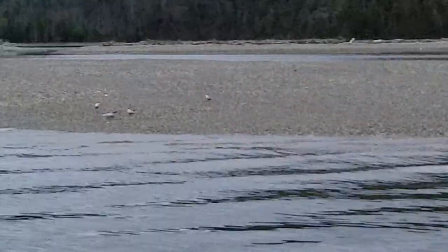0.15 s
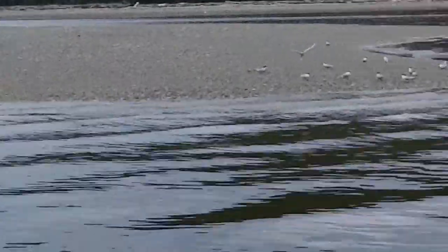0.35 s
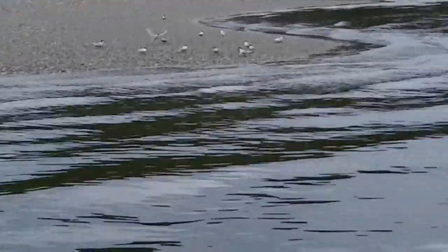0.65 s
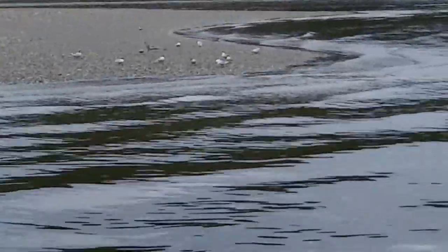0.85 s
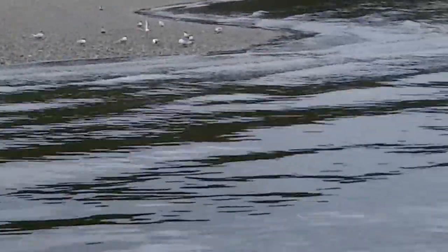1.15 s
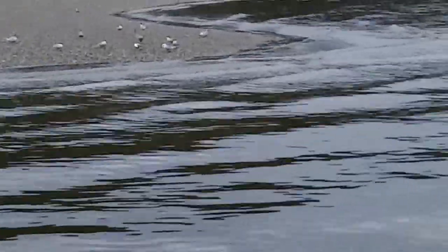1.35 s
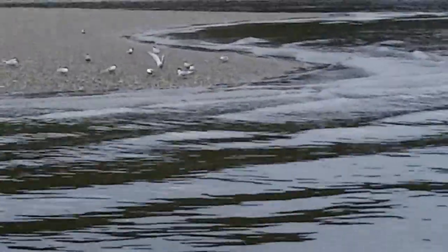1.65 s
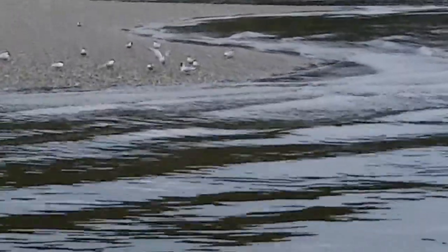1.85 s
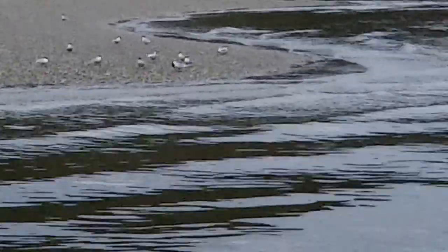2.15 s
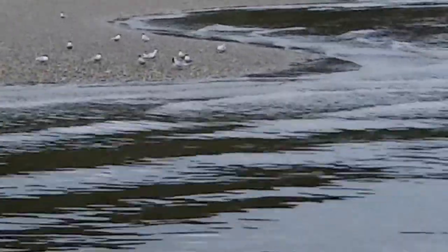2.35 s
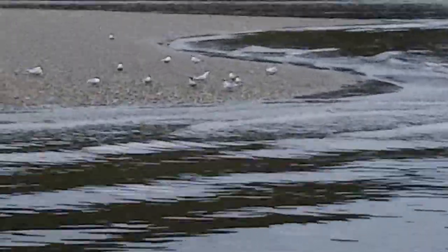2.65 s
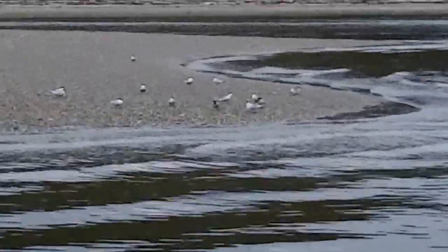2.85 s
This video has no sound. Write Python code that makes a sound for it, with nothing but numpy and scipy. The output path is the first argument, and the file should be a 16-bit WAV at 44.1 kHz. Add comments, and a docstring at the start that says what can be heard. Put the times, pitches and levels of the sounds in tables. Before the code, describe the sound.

Terns squawk over one another almost without pause, raspy and chopped by throat flutter, loudest at the start. A flock behind them, soft water wash and a low idling boat engine continue underneath; small taps come early.

```python
"""Throughout, water washes, a small boat's two-cylinder engine idles and far terns squawk on a gravel spit.
From the first moments near terns squawk over each other until the end: each call is a whistle with
overtones, chopped by a flutter in the throat. A low-level hum stops after a third of a second, about when
the first of four ticks on board sounds. Water is shaped noise; engine and ticks are struck, ringing modes."""
import sys
import numpy as np
from scipy import signal
from scipy.fft import rfft, irfft, next_fast_len
from scipy.io import wavfile
from scipy.ndimage import uniform_filter1d

SR = 44100
rng = np.random.default_rng(int(sys.argv[2]) if len(sys.argv) > 2 else 0)


def generate_wav(signal):
    """Clip the signal to [-1, 1] and save it as 16-bit WAV at the path in sys.argv[1]."""
    frames = np.transpose(np.atleast_2d(signal))
    scaled = np.clip(frames, -1, 1) * 32767
    pcm = np.round(scaled).astype(np.int16)
    wavfile.write(sys.argv[1], SR, pcm)


def elevation(decibels):
    """Turn decibel levels (scalar or array-like) into linear amplitude ratios."""
    levels = np.asarray(decibels, float)
    return 10 ** (levels / 20)


N = 132741  # length in samples


def set_rms(x, rms_db):
    """Scale a sound to an rms (average power) level."""
    return x * elevation(rms_db) / np.sqrt(np.mean(x ** 2))


def walk(rate_hz, size=N):
    """Smooth random wander with a spread of about 1: random steps at rate_hz, averaged twice."""
    hold = int(SR / rate_hz)
    steps = np.repeat(rng.standard_normal(size // hold + 1), hold)
    smooth = uniform_filter1d(uniform_filter1d(steps, hold), hold)
    return 1.752 * smooth[:size]  # restores the spread lost in averaging


def ring(x, pitch_hz, t60_s):
    """One vibrating mode driven by x: a tone that dies away by 60 dB in t60_s."""
    pole = np.exp(2j * np.pi * pitch_hz / SR - np.log(1000) / (t60_s * SR))
    return signal.lfilter([1], [1, -pole], x).imag


def wash():
    """Water: third-octave bands of noise that swell together and also flicker one by one."""
    # relative spectrum of water wash and hiss: pitch_hz [Hz], level_db [dB per Hz]
    spectrum = [(25, 9), (60, -26.5), (150, -6.5), (320, -13), (520, -15), (800, -15.5), (1150, -13.5),
                (1800, -18), (3000, -44), (5000, -30.5), (6500, -36.5), (7700, -62), (8600, -40),
                (10000, -43.5), (14500, -46)]
    wash_db = -40  # rms
    swell_db, flicker_db, treble_flicker_db = 0.45, 2.25, 3.15
    n = next_fast_len(N)
    f = np.fft.rfftfreq(n, 1 / SR) + 1  # the 1 avoids log of zero
    pitch_hz, level_db = np.array(spectrum).T
    noise = rfft(rng.standard_normal(n)) * elevation(np.interp(np.log(f), np.log(pitch_hz), level_db))
    swell = swell_db * walk(2.95)
    band_number = np.round(3 * np.log2(f))
    out = np.zeros(N)
    for b in range(13, 43):
        band = irfft(noise * (band_number == b), n)[:N]
        own_db = treble_flicker_db if b > 38 else flicker_db  # treble: above about 7300 Hz
        out += band * elevation(swell + own_db * walk(8.796))
    return set_rms(out, wash_db)


def engine():
    """A strong and a weak firing per cycle, each with a puff of gas, ring the exhaust and the hull."""
    # hull and exhaust modes: pitch_hz [Hz], t60_s [s], relative level_db [dB], lag_s after firing [s],
    # weak_db of the weak firing against the strong one [dB]
    modes = [(97.8, 0.28, -4.5, 0.0027, -30), (153, 0.13, 1, 0.0026, 0), (238.5, 0.13, 1, 0.00392, -11.5),
             (376, 0.15, 0.5, 0.01177, 2), (408.4, 0.13, 2.5, .022, -1.5), (632.6, 0.24, -5, 0.011, 1.5)]
    cycle_hz, first_s = 9.25, 0.066
    jitter_s, scatter_db = 0.0015, 1.5  # unevenness of the firings
    engine_db, fade_db_per_s = -42.5, -0.23  # rms before the fade, which is centred on mid-scene
    puff_db, puff_s = -14, 0.014  # puff against the direct ring; its decay time constant
    k = np.arange(-2, 60)
    late, stronger = rng.standard_normal((2, len(k)))
    firing_s = first_s + k / (2 * cycle_hz) + jitter_s * late
    out = np.zeros(N)
    for pitch_hz, t60_s, level_db, lag_s, weak_db in modes:
        i = ((firing_s + lag_s) * SR).astype(int)
        inside = (i >= 0) & (i < N)
        strength = elevation(weak_db * (k % 2) + scatter_db * stronger)  # every odd firing is the weak one
        pulses = np.zeros(N)
        pulses[i[inside]] = strength[inside]
        gas = signal.lfilter([1], [1, -np.exp(-1 / (puff_s * SR))], pulses) * rng.standard_normal(N)
        direct = set_rms(ring(pulses, pitch_hz, t60_s), 0)
        puff = set_rms(ring(gas, pitch_hz, t60_s), puff_db)
        out += set_rms(direct + puff, level_db)
    t = np.arange(N) / SR
    return set_rms(out, engine_db) * elevation(fade_db_per_s * (t - t.mean()))


def hum():
    """A steady tone with a slightly wandering phase that stops about when the first tick sounds."""
    hum_hz, hum_db, end_s = 372, -49, 0.35  # level is rms while it sounds
    t = np.arange(N) / SR
    tone = np.sin(2 * np.pi * hum_hz * t + walk(32.5))
    fade_out = np.clip(SR / 900 * (end_s - t), 0, 1)  # over 900 samples
    return np.sqrt(2) * elevation(hum_db) * tone * fade_out


def squawk(curve, hoarse, chop_at_s, flutter_hz, drift, sag, dip_db, *partials_db):
    """Overtones on a gliding pitch; each flutter cycle pulls pitch and level down; breath roughens each line."""
    s, hz, db = np.array(curve).T
    i = np.arange(max(int(s[0] * SR), 0), min(int(s[-1] * SR), N))
    t, n = i / SR, len(i)
    since_start = t - s[0]

    # flutter: a train of chops, each about as long whatever the rate
    chop_s, pitch_lag = 0.0022, 0.17  # width of a chop [s], delay of its pitch dip [rad]
    cycles = flutter_hz * (t - chop_at_s) + drift / 2 * (t - t.mean()) ** 2
    turn = 2 * np.pi * cycles + hoarse * walk(28.6, n)
    sharp = 1 / (2 * np.pi * flutter_hz * chop_s) ** 2

    def chop(lag):
        """Rises from 0 to 1 and back once per flutter cycle, narrowly around its peak."""
        return (np.exp(sharp * (np.cos(turn - lag) + 1)) - 1) / (np.exp(2 * sharp) - 1)

    # the flutter eases where pitch leaps over the call's usual pitch
    calm_above, calm_share = 1.045, 0.69
    glide = uniform_filter1d(np.interp(t, s, hz), SR // 100)
    leap = np.clip(20 * (glide / np.median(glide) - calm_above), 0, 1)
    depth = 1 - calm_share * leap

    # the flutter bites deeper into the pitch while a call gets going
    onset_sag, onset_s = 0.897, 0.05014
    pitch_depth = sag * depth * (1 + onset_sag * np.exp(-since_start / onset_s))
    slide = 0.13  # pitch slides down through each pulse, as a share of the sag
    pulled = pitch_depth * (chop(pitch_lag) - slide * np.sin(turn))
    wobble, rasp = 0.0025, 0.05  # pitch scatter as a share of pitch: always, and at full hoarseness
    pitch = glide * (1 - pulled + wobble * walk(144.9, n) + hoarse * rasp * walk(500, n))
    phase = 2 * np.pi * np.cumsum(pitch) / SR

    # partials 1 to 8, relative to partial 2; the third is strongest early in a call
    shimmer_db, breath_db = 1.1, -21
    bright_db, bright_s = 7, 0.1
    upper_db = [-33.5, -30.5, -27.5, -24.5]
    voice = np.zeros(n)
    for number, part_db in enumerate([partials_db[0], 0, *partials_db[1:], *upper_db], 1):
        if number == 3:
            part_db = part_db + bright_db * np.exp(-since_start / bright_s)
        line = np.sin(number * phase)
        breath = elevation(breath_db) * walk(900, n) * np.cos(number * phase)
        voice += elevation(part_db + shimmer_db * walk(58.3, n)) * (line + breath)

    attack_s, release_s, rasp_db = 0.0067, 0.0044, 3
    edge = np.clip(np.minimum(since_start / attack_s, (s[-1] - t) / release_s), 0, 1)
    loudness_db = np.interp(t, s, db) - dip_db * depth * chop(0) + hoarse * rasp_db * walk(400, n)
    out = np.zeros(N)
    out[i] = np.sqrt(2) * voice * edge * elevation(loudness_db)
    return out


def far_birds():
    """Fifty hoarse calls scattered in time and pitch, evened out and then given the crowd's loudness."""
    # rms loudness of the far crowd before air and echo: start_s [s], level_db [dB]
    crowd = [(0, -33), (0.741, -32.5), (.78, -51), (.86, -39.5), (0.889, -29.5), (1.1, -32.5), (1.18, -59),
             (1.215, -52), (1.228, -34.5), (1.44, -34), (1.47, -48), (1.67, -37), (1.97, -38.5),
             (2.01, -51.5), (2.35, -43), (2.43, -59), (2.64, -41), (3.01, -43.5)]
    usual_hz, pitch_spread, hoarse = 1350, 0.16, 0.6
    far = np.zeros(N)
    for k, (a, b, c) in enumerate(rng.standard_normal((50, 3))):
        start = k / 16 - 0.2 + 0.03 * a
        hz = usual_hz * (1 + pitch_spread * b)
        db = 2 * c
        curve = [(start, 0.85 * hz, db - 4), (start + 0.08, hz, db),
                 (start + 0.24, 0.96 * hz, db), (start + 0.31, 0.84 * hz, db - 4)]
        far += squawk(curve, hoarse, start, 70 + 12 * a, 0, 0.1, 7, -10, -5, -10)
    even = far / np.sqrt(uniform_filter1d(far ** 2, SR // 5))
    return even * elevation(np.interp(np.arange(N) / SR, *np.array(crowd).T))


def near_birds():
    """The near terns, one squawk for each row of the three tables."""
    # one curve per call: start_s [s], pitch_hz [Hz], level_db of partial 2 before the chops [dB]
    curves = [
        [(0.04, 1290, -27.5), (0.08, 1500, -29), (0.125, 1555, -29.5), (0.19, 1455, -23), (0.225, 1353, -24),
         (0.255, 1114, -28)],
        [(0.255, 1299, -20), (0.29, 1570, -24), (0.32, 1590, -26.5), (0.35, 1535, -14)],
        [(0.322, 1491, -36), (0.35, 1738, -29.5), (0.44, 1580, -26), (0.51, 1549, -26), (0.6, 1617, -23),
         (0.63, 1570, -23.5), (0.655, 1353, -21)],
        [(0.65, 1218, -20), (0.68, 1190, -29), (0.72, 1180, -33)],
        [(0.44, 1304, -35), (0.5, 1353, -29.5), (0.7, 1390, -31), (0.76, 1522, -40)],
        [(0.73, 1497, -37), (0.78, 1762, -40.5), (0.875, 1778, -42)],
        [(0.88, 1416, -34), (0.92, 1356, -33), (0.97, 1241, -57), (1.07, 1275, -37), (1.11, 1513, -39)],
        [(0.965, 1450, -32), (1.01, 1260, -33), (1.05, 1040, -39), (1.08, 1194, -36)],
        [(1.065, 1219, -39), (1.108, 1498, -39), (1.15, 1530, -35), (1.178, 1223, -38)],
        [(1.225, 1139, -49), (1.265, 1200, -41), (1.28, 1348, -28.5), (1.33, 1384, -29.5), (1.4, 1357, -31),
         (1.445, 1352, -29.5)],
        [(1.4, 1255.0, -56), (1.45, 1159, -31.5), (1.51, 1107, -35)],
        [(1.455, 1494, -46), (1.49, 1790, -37.5), (1.51, 1870, -45)],
        [(1.505, 1362, -33), (1.555, 1460, -37.5), (1.585, 1136, -37)],
        [(1.585, 1244, -32), (1.62, 1185, -44.5), (1.665, 1223, -40), (1.7, 1215, -34)],
        [(1.68, 1010, -38), (1.738, 1168, -27.5), (1.75, 1370, -29.5), (1.815, 1340, -31)],
        [(1.81, 1100, -29), (1.86, 1063.0, -31), (1.92, 1067, -34.5), (1.95, 1473, -34.5), (1.985, 1190, -41)],
        [(1.7, 1540, -42), (1.748, 1800, -34), (1.755, 1925, -26), (1.782, 1794, -40.5), (1.87, 1739, -37),
         (1.98, 1539, -38), (2.08, 1465, -40), (2.2, 1550, -39)],
        [(2.06, 1893, -44.5), (2.15, 1800, -44.5), (2.32, 1756, -38.5), (2.355, 1695, -38)],
        [(2.082, 1169, -32.5), (2.15, 1225, -28), (2.34, 1234, -27.5), (2.365, 1466, -38.5),
         (2.415, 1243, -30.5)],
        [(2.36, 1495, -54.5), (2.42, 1641, -48.5), (2.58, 1655, -45), (2.65, 1570, -53)],
        [(2.512, 1173, -32), (2.58, 1208, -28), (2.68, 1220, -30), (2.76, 1127, -31), (2.795, 1372, -34),
         (2.83, 1190, -33)],
        [(2.65, 1375, -44), (2.69, 1590, -39.5), (2.74, 1587, -41.5), (2.79, 1575, -42)],
        [(2.75, 1483, -51), (2.85, 1490, -43), (2.92, 1502, -45.5), (3.005, 1336, -46)],
        [(2.83, 1170, -43), (2.9, 1110, -45.5), (2.95, 1130, -49)],
    ]
    # throat flutter per call: chop_at_s, about where one chop falls [s], flutter_hz mid-call [Hz],
    # drift [Hz/s], pitch sag [share], level dip_db [dB], partials 1, 3 and 4 against partial 2 [dB]
    flutters = [(0.1507, 81.6, -29, 0.098, 3.5, -40, -13, -19),
                (0.3079, 91, 268, 0.15, 21, -27, -17.5, -21.5),
                (0.4945, 34.83, -11, 0.035, 12.5, -13.5, -12, -18.5),
                (0.693, 35.5, 182, 0.031, 23, -13, -16, -18),
                (0.6045, 80.0, -35, 0.09, 15, -18.5, -5, -11.5),
                (0.8076, 58.4, -54, 0.081, 6.5, 1, -9, -12.5), (1.001, 64.8, 117, 0.11, 14, -8, -12, -10.5),
                (1.0264, 77, 210, 0.052, 9, -11, -24, -12), (1.121, 101.6, 268, 0.06, 11, -3, -14, -18),
                (1.3337, 87.8, -80, 0.054, 6.5, -12.5, -20.5, -19),
                (1.4512, 69, 245, 0.2, 13, -12, -13, -36), (1.481, 76, -464.0, 0.0654, 0.5, -4, -17, -24),
                (1.545, 93.5, -279.0, 0.0497, 9, -7.5, -27, -27),
                (1.644, 66, 149, 0.0482, 13, -5.5, -25, -34),
                (1.7505, 80.8, -124.0, 0.09, 5.5, -13.5, -15, -16),
                (1.8985, 82.2, 57, 0.099, 27, -12.5, -15, -20),
                (1.9566, 38.46, -4.5, 0.15, 37, -16, -11, -26), (2.203, 78.1, 13, 0.06, 15, -8.5, -7, -17),
                (2.2475, 80.2, -3, 0.18, 8, -15, -20, -20.5), (2.507, 50, -6, 0.23, 7, -4.5, 4, -24),
                (2.6694, 74, -2, 0.18, 13, -16, -30, -20), (2.7248, 70.5, 0.0, 0.05, 7, -2.5, -7, -18),
                (2.8822, 32.7, -8, 0.061, 21, 2, -3, -13), (2.888, 71.7, -2, 0.08, -0.5, -3.5, -7.5, -19)]
    # hoarseness per call: 0 clear to 1 full rasp [share]
    hoarseness = [.06, .2, .02, .1, .25, .3, .35, .2, .18, .15, .5, .2, .2, .2, .25, .25, .08, .06, .22,
                  .04, .22, .1, .06, .4]
    return sum(squawk(curve, hoarse, *flutter)
               for curve, hoarse, flutter in zip(curves, hoarseness, flutters))


def through_air(birds):
    """Distance dulls the birds: the treble above 6560 Hz is turned down by 20 dB."""
    dull = signal.sosfilt(signal.butter(8, 6560, fs=SR, output="sos"), birds)
    return dull + elevation(-20) * (birds - dull)


def shore_echo(birds):
    """Adds a short smear off the shore: the birds blurred by a fading burst of noise."""
    echo_db, t60_s = -20, 0.11
    t = np.arange(SR // 2) / SR
    tail = rng.standard_normal(len(t)) * elevation(-60 * t / t60_s)
    tail = tail / np.sqrt(np.sum(tail ** 2))
    return birds + elevation(echo_db) * signal.fftconvolve(birds, tail)[:N]


def ticks():
    """Small taps close to the microphone ring a set of modes; soft ones ring mainly the first mode."""
    # taps: start_s [s], relative level_db [dB], bright_db added to all modes but the first [dB]
    taps = [(0.3517, -9.5, 4), (.385, -15, -6), (0.486, -14, -6), (1.033, -17, -18)]
    # modes of the tapped thing: pitch_hz [Hz], t60_s [s], relative level_db [dB]
    modes = [(770, 0.014, -4), (2260, 0.008, -0.5), (3840, 0.0055, 6.5), (4120, 0.025, -1.5),
             (10000, 0.011, -23), (13600, 0.0036, -34), (180, 0.012, -17), (328, 0.015, -21.5)]
    out = np.zeros(N)
    for k, (pitch_hz, t60_s, mode_db) in enumerate(modes):
        hits = np.zeros(N)
        for start_s, level_db, bright_db in taps:
            hits[int(start_s * SR)] = elevation(level_db + mode_db + bright_db * (k > 0))
        # a soft contact, but a sharp one for the highest modes so that they still ring
        push = np.hanning(11 if pitch_hz < 8000 else 3)
        out += ring(np.convolve(hits, push / push.sum())[:N], pitch_hz, t60_s)
    return elevation(-7.5) * out


def scene():
    """One microphone, the same in both channels."""
    birds = shore_echo(through_air(far_birds() + near_birds()))
    mix = wash() + engine() + hum() + birds + ticks()
    return np.tile(mix, (2, 1))


def roll_off(x):
    """The treble ends steeply here."""
    return signal.sosfilt(signal.butter(12, 15260, fs=SR, output="sos"), x)


def record(dry):
    """The camera cuts the deepest bass, below 40 Hz, and the top, above 15100 Hz."""
    bass_cut = signal.butter(3, 40, "high", fs=SR, output="sos")
    top_cut = signal.ellip(8, 0.2, 60, 15100, fs=SR, output="sos")
    finished = signal.sosfilt(np.vstack([bass_cut, top_cut]), dry)
    return roll_off(finished)


dry = scene()
out = record(dry)
generate_wav(out)
```